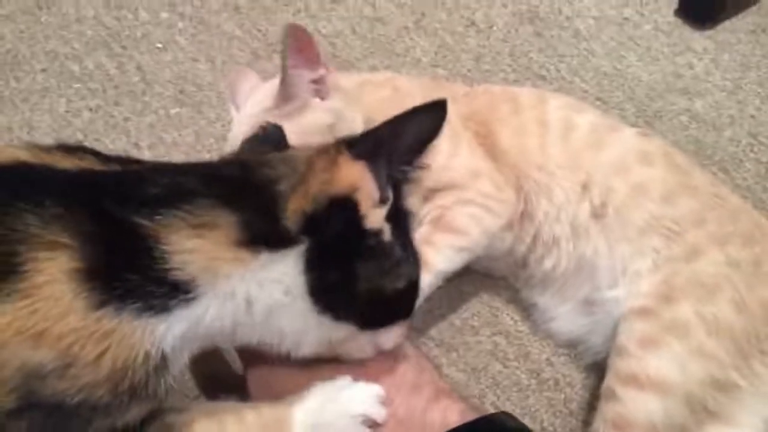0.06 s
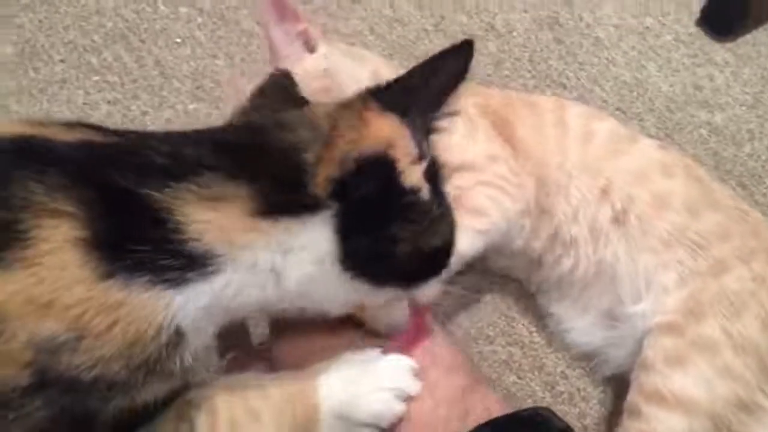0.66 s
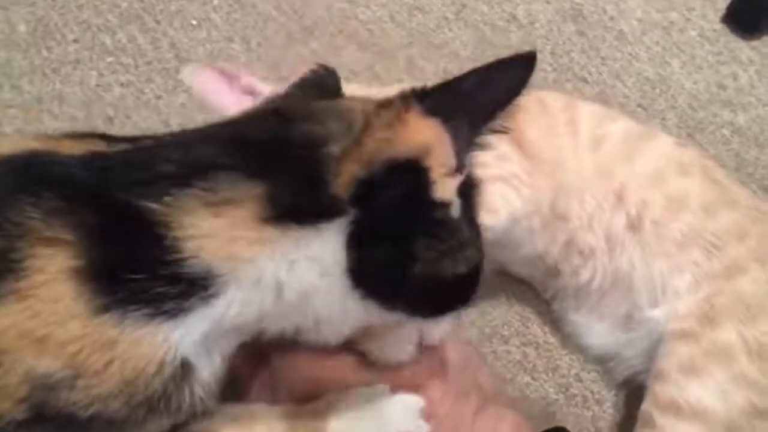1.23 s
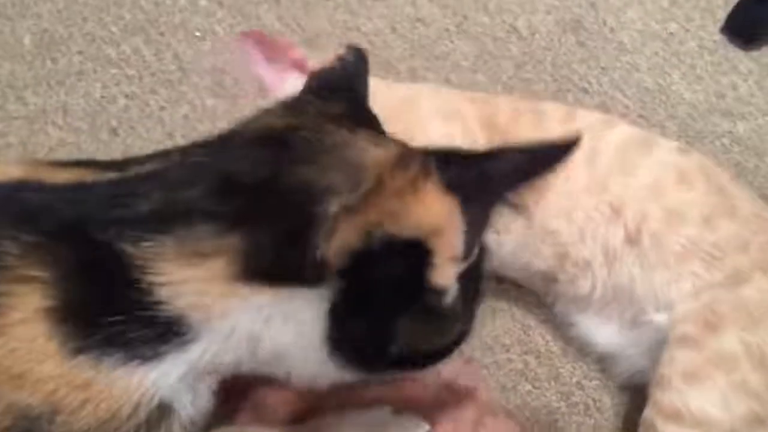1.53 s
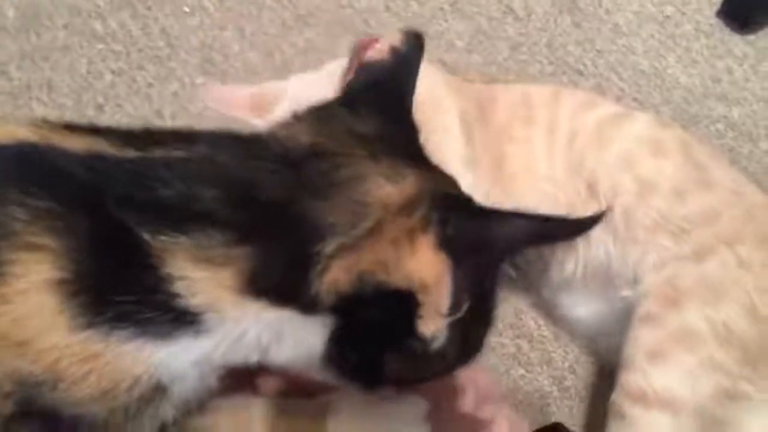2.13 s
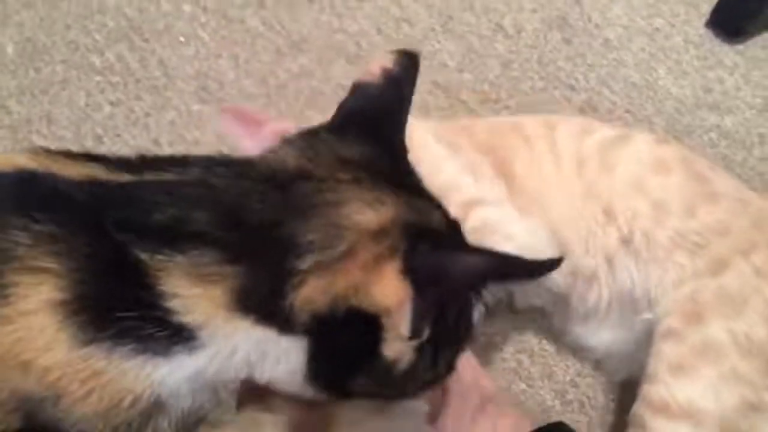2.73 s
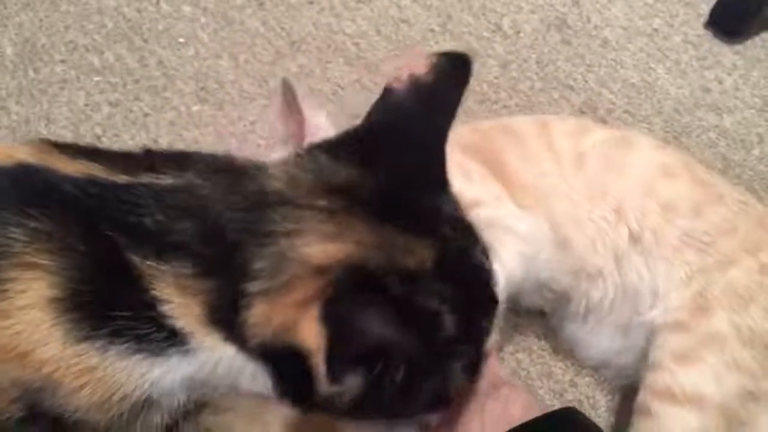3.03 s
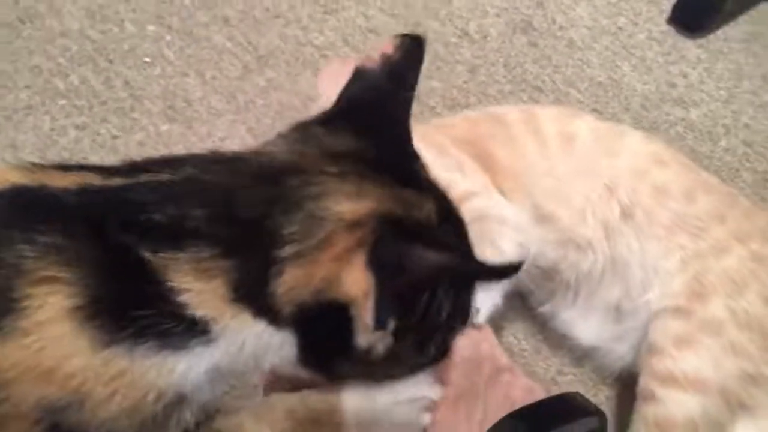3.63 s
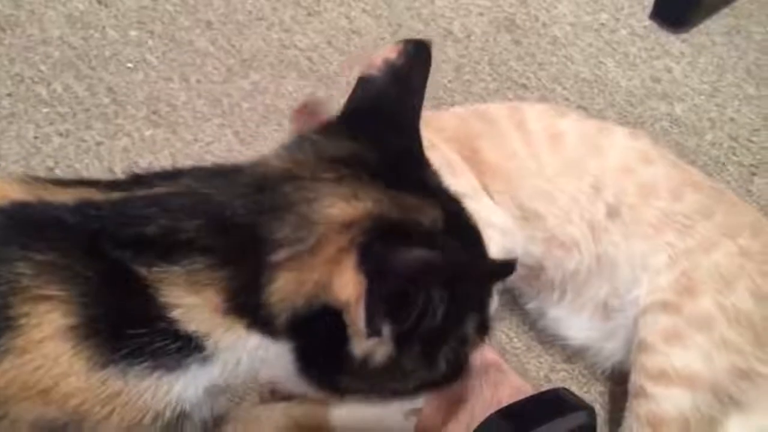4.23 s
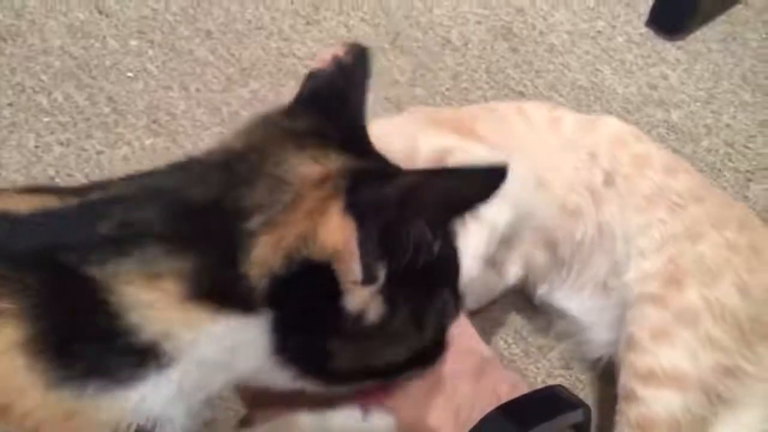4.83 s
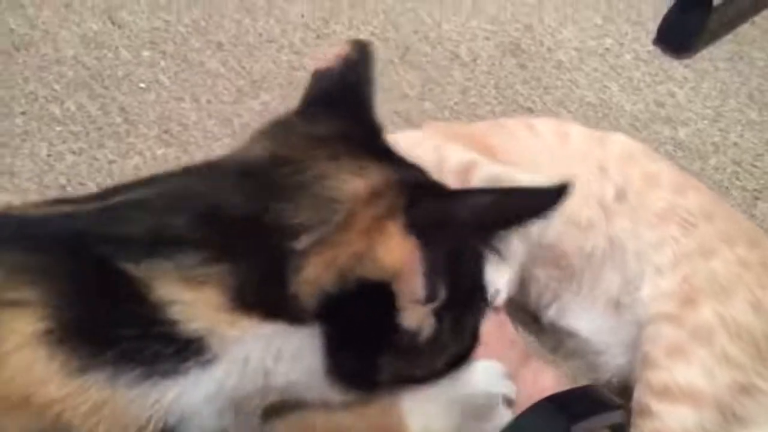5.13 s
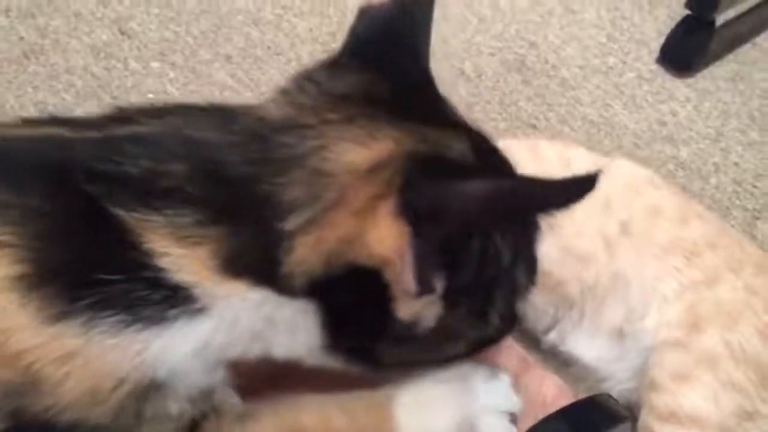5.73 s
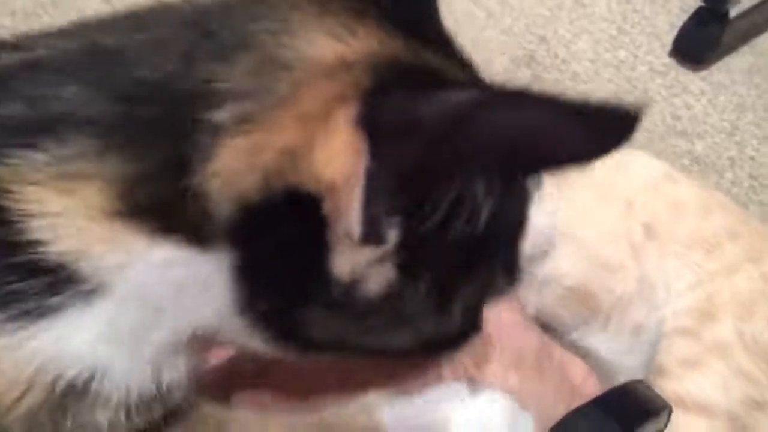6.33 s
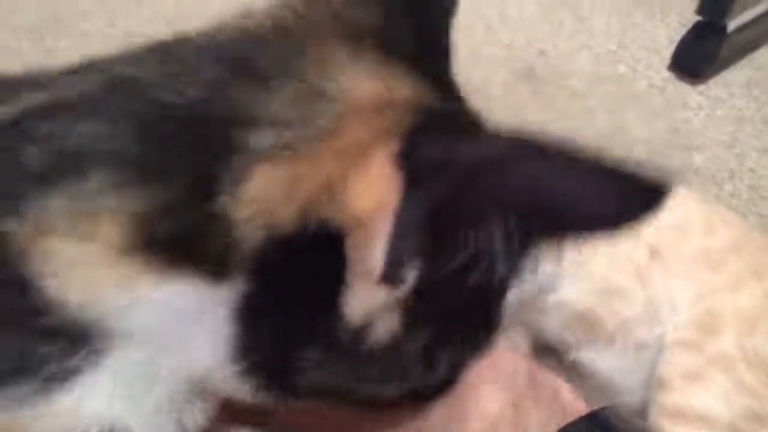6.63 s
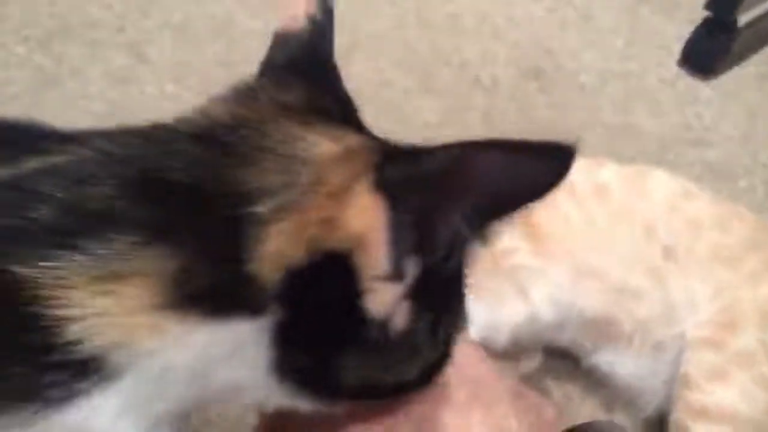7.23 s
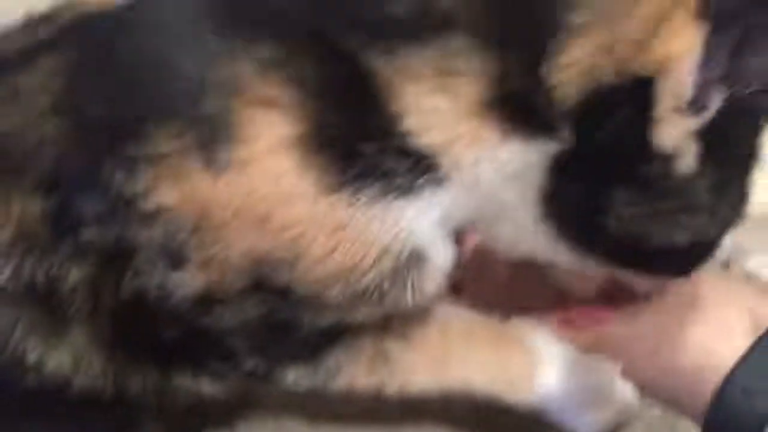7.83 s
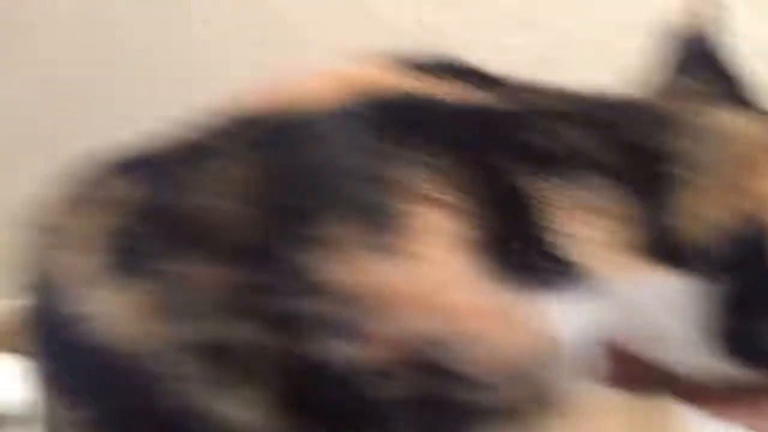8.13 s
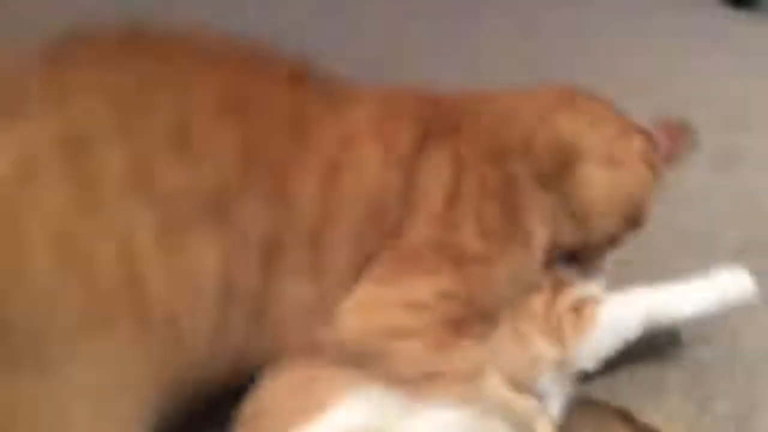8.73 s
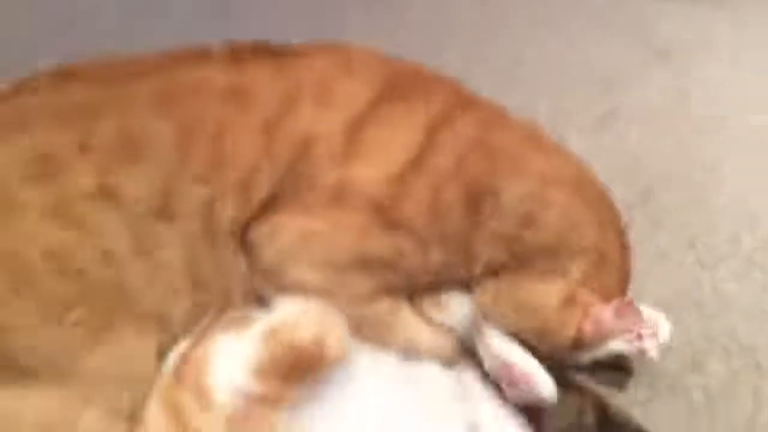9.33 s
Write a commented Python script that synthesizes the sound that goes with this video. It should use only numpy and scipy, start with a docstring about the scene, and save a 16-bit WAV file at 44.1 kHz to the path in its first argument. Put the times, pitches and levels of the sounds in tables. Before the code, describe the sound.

A low, purr-like drone, probably an air conditioner, fills a room with a fluttering hum, rumble and light hiss. Close to the microphone, cats groom and shift on a carpet, making faint fur rubs and occasional small wet licks. Near the end, fur and cloth brush past the microphone, and the hand holding it adds dull rumbles, a few soft bumps and finger slides.

```python
"""A low, purr-like drone fills a room, probably from an air conditioner: a steady hum at twice the
mains frequency flutters as it beats against the rumble of moving air. Cats groom and shift on a carpet;
friction gives faint rubs of fur, licks ring the mouth, and hairs snap free with small ticks.
Late on, fur and cloth brush past the microphone, and the hand swings, bumps and slides on its case,
exciting a dull thrum and the case's damped modes."""
import sys
import numpy as np
from scipy import signal
from scipy.fft import rfft, irfft, next_fast_len
from scipy.io import wavfile
from scipy.ndimage import uniform_filter1d, map_coordinates

SR = 44100
rng = np.random.default_rng(int(sys.argv[2]) if len(sys.argv) > 2 else 0)


def output_pcm(signal):
    """Save a mono or channel-first signal as 16-bit PCM at the path in sys.argv[1].

    Samples are clipped to [-1, 1] before scaling.
    """
    pcm = np.clip(np.atleast_2d(signal).T, -1, 1) * 32767
    wavfile.write(sys.argv[1], SR, np.round(pcm).astype(np.int16))


N = 422061
HUM_HZ, BAND_LIMIT_HZ = 120.02, 15750

# the steady hum's flutter as it beats against the rumble: time_s, level_db
HUM_FLUTTER = [(0.0, -43.2), (0.56, -48.5), (0.86, -43.5), (1.1, -39.5), (1.22, -53), (1.4, -40),
               (1.56, -47), (1.64, -44.5), (2.04, -50), (2.36, -41), (2.5, -46.5), (3.16, -43),
               (3.4, -47.5), (3.52, -42.5), (3.62, -50.5), (3.92, -43.5), (4.14, -48), (4.28, -41.5),
               (4.38, -50.5), (4.46, -40), (4.64, -45.9), (4.84, -41), (4.98, -48), (5.1, -41.5),
               (5.48, -50), (5.62, -41), (5.76, -46.5), (5.84, -43.5), (6.14, -42.5), (6.66, -47),
               (7.14, -46), (7.26, -40.5), (7.4, -48), (7.56, -42), (7.76, -49.6), (7.82, -44), (8.28, -45),
               (8.38, -45), (8.66, -42.5), (8.78, -45.2), (8.92, -42.5), (9.14, -49.5), (9.22, -41),
               (9.56, -42.5)]
# weaker tones of shaft, mains and fan: pitch_hz, level_db
MACHINE_TONES = [(57, -74), (135, -65), (240, -69), (625, -87), (644, -86.5)]
# low resonances of ducts and room: centre_hz, width_hz, gain_db
DUCT_MODES = [(69.6, 15, -7), (105.3, 15.8, 1.5), (110.7, 10.5, 4), (141.3, 13, 0.5), (163.2, 18, -3),
              (178.7, 29, -7.5), (204.4, 27.5, -5), (240, 31, -14), (274, 27, -24.5), (314, 84, -31),
              (358, 22, -23.5)]
# spectrum of the hiss of air and microphone: frequency_hz, relative_density_db
HISS_SPECTRUM = [(25, -8.5), (300, 2), (450, 1.5), (560, 1), (720, -1.3), (900, -2.3), (1250, -2),
                 (1420, -1.5), (1650, -6.5), (2300, -6), (2800, -10), (3700, -12.5), (5500, -16.5),
                 (12500, -21), (15500, -25.5)]
# faint whines in the airflow: pitch_hz, level_db
AIR_WHINES = [(890, -85), (1160, -87.5), (1385, -89), (2165, -91), (2325, -90.5)]
# the cats' coats, louder as the microphone comes closer: time_s, base_level_db
COAT_LEVELS = [(0, -80.5), (5, -83.5), (6.3, -75), (7.5, -81.5), (9.57, -78.5)]
# rubs of tongue, paw and hand on fur, and one brief faint whistle in the airflow (at 2.348 s):
# peak_s, level_db, half_length_s, pitch_hz, spread_octaves
RUBS_AND_WHISTLE = [(0.057, -65, 0.025, 583, 0.25), (0.29, -73, 0.033, 950, 0.46),
                    (1.165, -70, 0.022, 600, .8), (1.435, -69, 0.018, 600, 1.3),
                    (2.348, -75.5, 0.15, 1382, 0.031), (2.332, -81, .1, 2900, .5),
                    (3.208, -77, 0.049, 334, .3), (3.355, -70, .018, 950, .3), (3.4, -80, .04, 340, 0.54),
                    (3.476, -68, 0.02, 1070, 0.46), (3.865, -70, 0.049, 950, 0.45),
                    (4.29, -69, 0.041, 600, 1), (4.503, -69, .025, 846, 0.6), (4.66, -74, 0.016, 900, .4),
                    (5.23, -83, .07, 5400, .35), (5.953, -69.5, 0.07, 400, 0.82),
                    (6.253, -69, .025, 850, .5), (6.647, -60, 0.042, 313, 0.43),
                    (6.645, -75, .014, 3800, .2), (6.664, -66, 0.028, 660, 0.72),
                    (6.665, -83, .035, 8000, .9), (7.045, -64.5, 0.015, 1500, 0.77),
                    (7.06, -84, .04, 7500, .9), (7.133, -66, 0.017, 1250, 0.46),
                    (7.275, -69, 0.03, 600, 0.69), (7.657, -73.5, 0.059, 3590, .08),
                    (7.699, -65, 0.046, 900, 0.57), (7.751, -68, 0.032, 2120, .4),
                    (7.795, -71.5, .025, 3900, 0.27), (7.835, -69, .03, 1850, 0.37),
                    (7.882, -72, .022, 2500, .3), (8.343, -70, 0.07, 1600, 1.1),
                    (8.557, -74, .12, 2000, .8), (8.72, -74.5, 0.068, 5700, 0.5),
                    (8.73, -71.5, 0.031, 2960, 0.41), (8.728, -67, 0.024, 750, 0.14)]
# small clicks of tongue, mouth and fur: start_s, relative_level_db, pitch_hz, t60_s
TONGUE_CLICKS = [(1.648, -50, 1300, 0.022), (2.286, -61, 4600, .01), (3.058, -61, 5000, .01),
                 (3.923, -55, 2000, 0.022), (5.513, -55, 1700, .025), (6.309, -58, 4700, .012),
                 (6.348, -47, 1930, 0.025), (6.383, -62, 2190, 0.044), (7.043, -55, 1650, .02),
                 (7.125, -58, 1400, 0.033), (7.235, -54, 2030, .02), (7.316, -60, 4300, .014),
                 (7.486, -56, 2080, 0.041)]
# dry snaps of hairs and whiskers: start_s, level_db, pitch_hz, t60_s
HAIR_SNAPS = [(6.652, -72, 9000, 0.028), (6.716, -68, 5500, .012), (7.131, -70, 6000, 0.043),
              (7.328, -68, 6500, .018), (8.0095, -59, 12000, .005)]
# strokes of fur and cloth past the microphone: peak_s, level_db, rise_s, fall_s
BRUSH_STROKES = [(7.67, -68, 0.11, 0.098), (7.8, -67, 0.14, 0.13), (8.46, -68.5, 0.097, 0.17),
                 (8.72, -64, 0.17, 0.12), (9.0, -68.5, 0.14, 0.11)]
# spectrum of those strokes: frequency_hz, relative_density_db
BRUSH_SPECTRUM = [(200, -11), (900, 1), (1500, 1.5), (2200, 3), (3500, 1.5), (5000, -1), (7000, -4.5),
                  (10000, -8), (13000, -10), (15500, -13)]
# swings of the hand that holds the case: peak_s, relative_level_db, rise_s, fall_s
HAND_SWINGS = [(7.72, -48.5, 0.059, 0.14), (8.2, -54, 0.1, 0.14), (8.66, -44, 0.11, 0.082),
               (8.9, -47, 0.15, 0.046), (9.37, -50.5, 0.057, 0.046)]
# spectrum of the swung case's thrum: frequency_hz, relative_density_db
THRUM_SPECTRUM = [(30, -45), (65, -3), (110, -14), (180, 2), (250, -7), (330, -32), (600, -42),
                  (2000, -90)]
# resonances of the case: pitch_hz, gain_db, t60_s
CASE_MODES = [(213, -8, 0.075), (385, -2, 0.039), (508, 5, 0.024), (866, 1, 0.016), (1036, -4.5, 0.023),
              (3400, -8, 0.011), (4030, -1, 0.006)]
# bumps on the case: start_s, gain_db, contact_s
CASE_BUMPS = [(8.577, -26, 0.0044), (8.635, -27, 0.003), (8.648, -37, .005), (8.687, -46, 0.0057),
              (8.8137, -36, .0001)]
# fingers sliding on the case: peak_s, level_db, rise_s, fall_s
FINGER_SLIDES = [(8.67, -65, 0.044, 0.2), (8.93, -60, 0.036, 0.053), (9.0, -62, 0.02, 0.019)]
# narrow dips of the microphone's port: centre_hz, width_hz, gain_db
PORT_NOTCHES = [(4880, 420, -2.5), (7610, 390, -2.5), (10450, 280, -5.5)]


def amp(db):
    """Decibels to amplitude ratio."""
    return 10 ** (np.asarray(db) / 20)


def unit(x):
    """Normalise to rms 1."""
    return x / np.sqrt(np.mean(x ** 2) + 1e-20)


def level(rows):
    """A gain envelope interpolated through (time_s, level_db) rows."""
    return amp(np.interp(np.arange(N) / SR, *np.transpose(rows)))


def swells(rows):
    """A gain envelope of lopsided Gaussian bells, summed in power."""
    t = np.arange(N) / SR
    bells = (amp(db) * np.exp(-((t - peak_s) / np.where(t < peak_s, rise_s, fall_s)) ** 2)
             for peak_s, db, rise_s, fall_s in rows)
    return np.sqrt(sum(bell ** 2 for bell in bells))


def wobble(rate_hz):
    """Smooth random modulation with rate_hz knots a second."""
    return map_coordinates(rng.standard_normal(int(N * rate_hz / SR) + 4), [np.arange(N) * rate_hz / SR])


def filtered(x, response):
    """Linear filtering: the spectrum of x times a frequency response."""
    size = next_fast_len(len(x) + 8192)
    return irfft(rfft(x, size) * response(np.fft.rfftfreq(size, 1 / SR)), size)[:len(x)]


def coloured(x, spectrum):
    """x shaped by (frequency_hz, gain_db) points, at rms 1."""
    f, db = np.transpose(spectrum)
    return unit(filtered(x, lambda hz: amp(np.interp(np.log(hz + 1), np.log(f), db))))


def band_noise(size, pitch_hz, octaves):
    """Noise of rms 1 in a band that is Gaussian in log frequency."""
    white = rng.standard_normal(size)
    return unit(filtered(white, lambda hz: np.exp(-(np.log2((hz + 1) / pitch_hz) / octaves) ** 2)))


def add(track, start_s, sound):
    """Superpose a short sound on a track."""
    span = track[round(start_s * SR):][:len(sound)]
    span += sound[:len(span)]


def motor(flutter_db=1.17, waver_db=1.0, hum_drift_rad=0.066, tone_drift_rad=0.26):
    """Forced vibration: the mains hum, its beating given as an envelope, and weaker, unsteady tones."""
    phase_per_hz = 2 * np.pi * np.arange(N) / SR
    flutter = amp(flutter_db * wobble(14)) * level(HUM_FLUTTER)
    out = flutter * unit(np.sin(HUM_HZ * phase_per_hz + hum_drift_rad * wobble(6)))
    for hz, db in MACHINE_TONES:
        tone_gain = amp(db + waver_db * wobble(4.5))
        out += tone_gain * unit(np.sin(hz * phase_per_hz + tone_drift_rad * wobble(3.7)))
    return out


def duct_rumble(level_db=-47.0, low_cut_hz=53, waver_db=1.0):
    """Resonance: broadband turbulence excites the low modes of ducts and room."""
    def ducts(f):
        power = sum(amp(db) ** 2 / (1 + 2 * ((f - hz) / width) ** 2) ** 2
                    for hz, width, db in DUCT_MODES)
        return np.sqrt(power / (1 + (low_cut_hz / (f + 1)) ** 12))
    return amp(level_db + waver_db * wobble(8)) * unit(filtered(rng.standard_normal(N), ducts))


def air_hiss(level_db=-67.0, walls_db=-5, t60_s=0.27):
    """Interference: echoes between the walls finely colour an even rush of air."""
    t = np.arange(SR // 4) / SR
    echoes = rng.standard_normal(len(t)) * amp(-60 * t / t60_s)
    direct = rng.standard_normal(N + len(t) - 1)
    reflected = signal.fftconvolve(direct, echoes / np.linalg.norm(echoes), "valid")
    return amp(level_db) * coloured(direct[:N] + amp(walls_db) * reflected, HISS_SPECTRUM)


def air_whines(octaves=0.015, swing_db=2, rate_hz=3.0):
    """Narrowband flow noise is heard as breathy whistles, each swelling and sinking on its own."""
    return sum(amp(db) * unit(amp(swing_db * wobble(rate_hz)) * band_noise(N, hz, octaves))
               for hz, db in AIR_WHINES)


def coat_rustle(crinkle_hz=950, shuffle_hz=305, shuffle_db=2.5):
    """Modulated friction noise: coats crinkle faintly and bodies shuffle on the carpet."""
    crinkle = amp(4.5 * wobble(22)) * band_noise(N, crinkle_hz, octaves=1.43)
    shuffle = amp(shuffle_db + 4.0 * wobble(9)) * band_noise(N, shuffle_hz, octaves=0.3)
    return level(COAT_LEVELS) * (crinkle + shuffle)


def rubs_and_whistle(grain=0.37, catch_rate_hz=260):
    """Stick-slip friction: rubs of fur swell and rasp in bands; the narrowest band is an air whistle."""
    out, t = np.zeros(N), np.arange(-SR // 4, SR // 4) / SR
    for peak_s, db, half_length_s, pitch_hz, octaves in RUBS_AND_WHISTLE:
        envelope = amp(db) * np.exp(-(t / half_length_s) ** 2)
        add(out, peak_s + t[0], envelope * band_noise(len(t), pitch_hz, octaves))
    rasp = unit(np.exp(grain * wobble(catch_rate_hz)))
    return out * rasp


def licks(gain_db=-3, smack_db=-16, attack_s=0.0008):
    """Damped cavity resonance: each lick rings the mouth briefly, with a wet smack around it."""
    out, t = np.zeros(N), np.arange(SR // 10) / SR
    for start_s, db, pitch_hz, t60_s in TONGUE_CLICKS:
        ring = np.sin(2 * np.pi * pitch_hz * t)
        smack = amp(smack_db) * band_noise(len(t), pitch_hz, octaves=0.87)
        envelope = amp(db + gain_db - 60 * t / t60_s) * (1 - np.exp(-t / attack_s))
        add(out, start_s, envelope * (ring + smack))
    return out


def hair_ticks(attack_s=0.00045):
    """Sudden release gives a broadband transient: a hair snaps free with an unpitched crack."""
    out, t = np.zeros(N), np.arange(SR // 10) / SR
    for start_s, db, pitch_hz, t60_s in HAIR_SNAPS:
        envelope = amp(db - 60 * t / t60_s) * (1 - np.exp(-t / attack_s))
        add(out, start_s, envelope * band_noise(len(t), pitch_hz, octaves=0.75))
    return out


def brushing(grain=0.29, patchy_db=3.0):
    """Incoherent addition: countless hair slips sum to noise whose colour shifts as the contact moves."""
    slips = rng.standard_normal(N) * np.exp(grain * wobble(2500))
    spectra = signal.stft(slips, nperseg=512)[2]
    # random patches of gain, smoothed over frequency and then over time
    patches = uniform_filter1d(rng.standard_normal(spectra.shape), size=3, axis=0)
    patches = unit(uniform_filter1d(patches, size=11, axis=1))
    shifting = signal.istft(spectra * amp(patchy_db * patches), nperseg=512)[1][:N]
    return swells(BRUSH_STROKES) * coloured(shifting, BRUSH_SPECTRUM)


def case_thrum(gain_db=-1):
    """Structure-borne sound: each swing of the hand sends a dull rumble through the case."""
    return amp(gain_db) * swells(HAND_SWINGS) * coloured(rng.standard_normal(N), THRUM_SPECTRUM)


def case_handling(attack_s=0.0018, scuff_db=-31, scuff_hz=330, scuff_t60_s=0.32):
    """Modal response: the forces of slides and bumps are convolved with the case's impulse response."""
    t = np.arange(SR // 5) / SR
    onset = 1 - np.exp(-t / attack_s)
    ring = onset * sum(amp(db - 60 * t / t60_s) * np.sin(2 * np.pi * hz * t)
                       for hz, db, t60_s in CASE_MODES)
    out = swells(FINGER_SLIDES) * unit(signal.fftconvolve(rng.standard_normal(N), ring)[:N])
    for start_s, db, contact_s in CASE_BUMPS:
        # a soft fingertip stays longer in contact and excites only the low modes
        force = np.sin(np.pi * np.clip(t / contact_s, 0, 1)) ** 2
        blow = signal.fftconvolve(ring, force / force.sum())[:len(t)]
        # the skin drags on for a moment after it lands
        drag = onset * band_noise(len(t), scuff_hz, octaves=0.58)
        scuff = amp(scuff_db - 60 * t / scuff_t60_s) * drag
        add(out, start_s, amp(db) * (blow + scuff))
    return out


def scene():
    """Superposition: the room's drone and the small close sounds add in one channel."""
    room = motor() + duct_rumble() + air_hiss() + air_whines()
    small_sounds = coat_rustle() + rubs_and_whistle() + licks() + hair_ticks()
    return (room + small_sounds + brushing() + case_thrum() + case_handling())[None]


def record(dry):
    """Frequency response: the microphone's port notches the treble; nothing passes the band limit."""
    def response(f):
        port_db = sum(db * np.exp(-((f - hz) / width) ** 2) for hz, width, db in PORT_NOTCHES)
        return amp(port_db) * (f < BAND_LIMIT_HZ)
    return np.array([filtered(channel, response) for channel in dry])


dry = scene()
out = record(dry)
output_pcm(out)
```